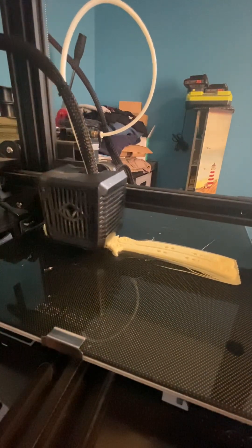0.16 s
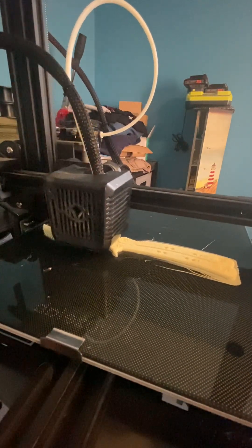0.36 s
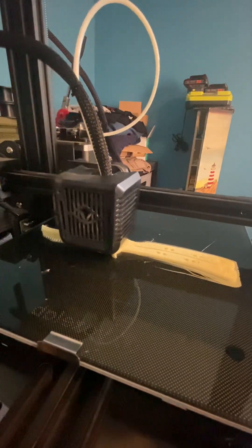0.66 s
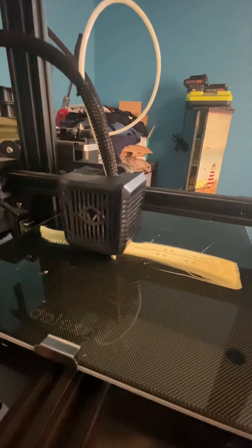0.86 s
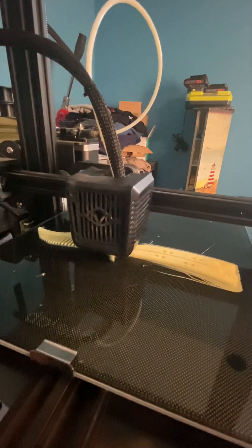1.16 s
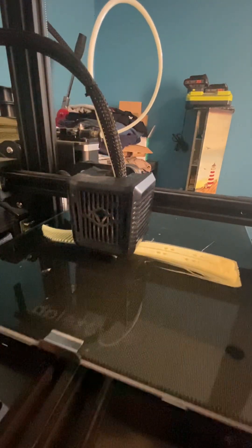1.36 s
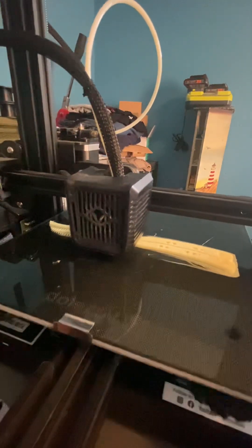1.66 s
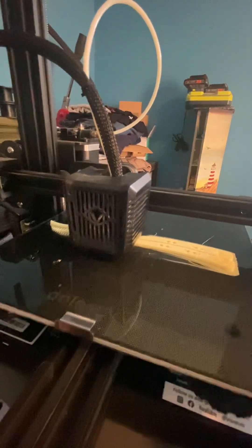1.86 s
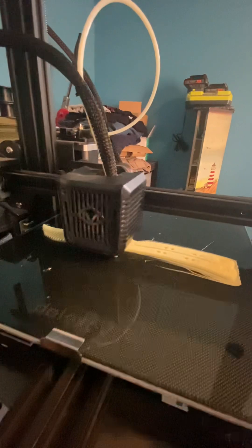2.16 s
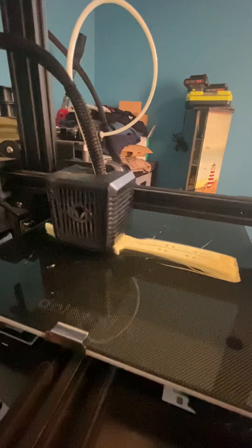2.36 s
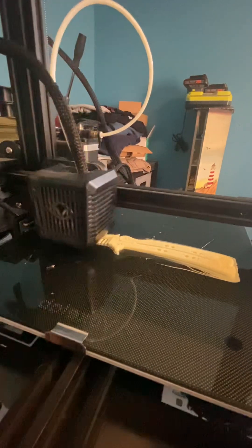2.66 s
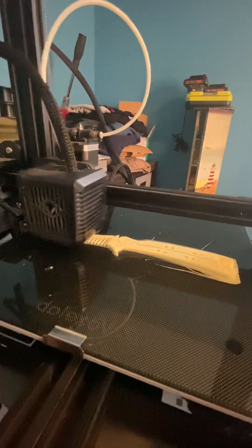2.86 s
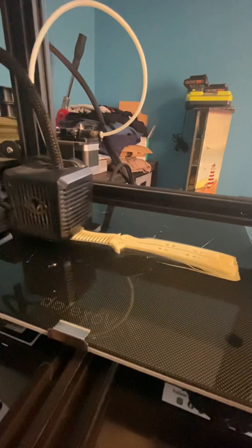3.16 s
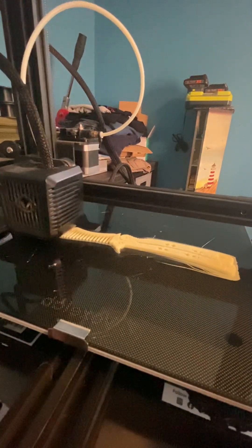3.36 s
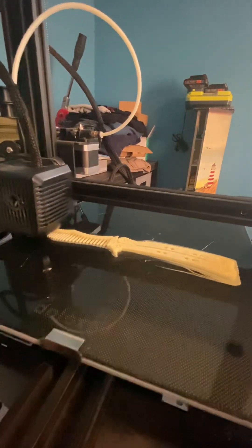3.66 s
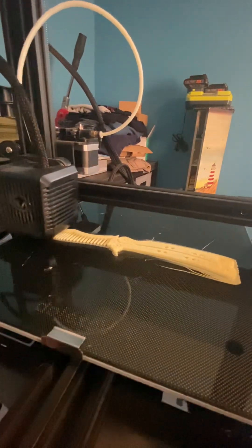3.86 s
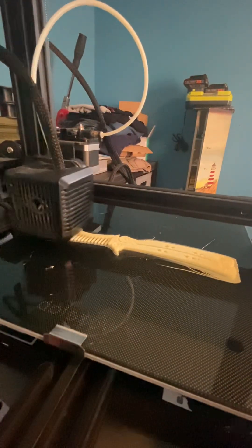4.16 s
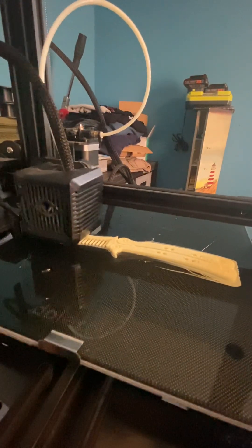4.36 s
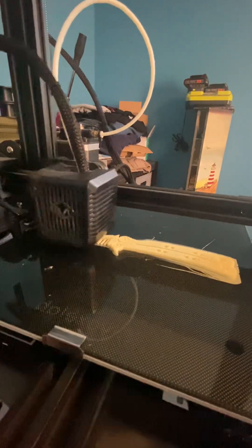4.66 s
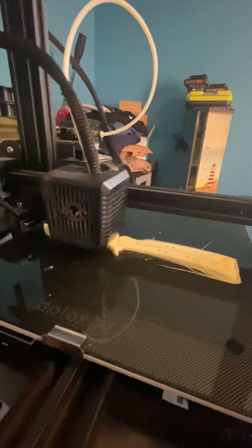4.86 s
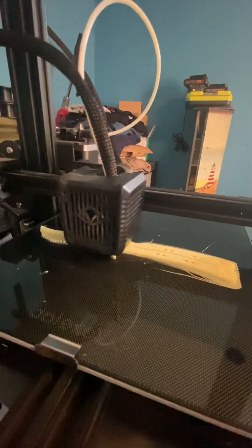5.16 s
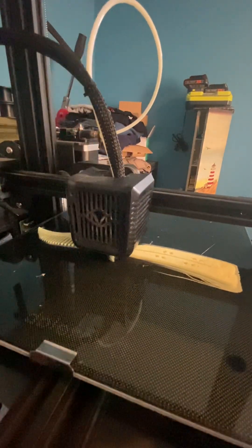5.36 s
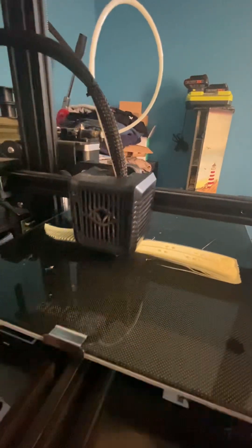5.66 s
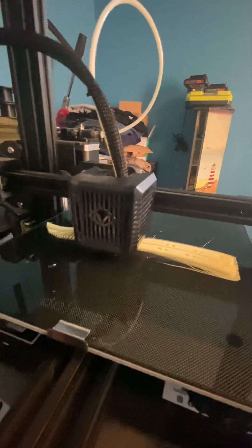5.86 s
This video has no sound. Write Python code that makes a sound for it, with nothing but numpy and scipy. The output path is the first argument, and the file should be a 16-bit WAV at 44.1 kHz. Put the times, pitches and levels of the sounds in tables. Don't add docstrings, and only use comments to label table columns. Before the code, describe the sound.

Small cooling fans whir and whine constantly over rushing air while a printer head slides about, its motors softly rumbling and knocking the table.

```python
import sys
import numpy as np
from scipy import signal
from scipy.fft import rfft, irfft, next_fast_len
from scipy.io import wavfile
from scipy.ndimage import uniform_filter1d

SR = 44100
rng = np.random.default_rng(int(sys.argv[2]) if len(sys.argv) > 2 else 0)


def persist_wave(psi):
    counts = np.round(np.clip(psi, -1, 1) * 32767).astype(np.int16)
    wavfile.write(sys.argv[1], SR, np.atleast_2d(counts).T)


def volts_from_db(level):
    exponent = np.asarray(level, float) / 20
    return 10 ** exponent


N = 265041
T = np.arange(N) / SR
BINS_HZ = np.linspace(1, SR / 2, next_fast_len(N) // 2 + 2)
SIDES = np.array([[.5], [-.5]])

# t/s, slide off to the left/0-1
HEAD_TRAVEL = [(0, .3), (.5, 0.23), (1.1, 0.02), (2.0, 0.12), (2.7, 0.36), (3.6, 0.91), (3.95, 0.86),
               (4.55, 0.52), (5.1, 0.14), (5.6, 0.24), (6.01, .1)]
# t/s, blade rate f/Hz
BLOWER_SPEED = [
    (0, 1188.8),
    (1.5, 1188.8),
    (2.2, 1186.2),
    (3.2, 1190.7),
    (3.6, 1189.2),
    (4.1, 1184.7),
    (4.9, 1182.2),
    (5.6, 1175.7),
    (6.01, 1175.1),
]
# f/Hz, level/dB per Hz
DUCT_AIR = [(900, -14), (1350, -9), (1750, -6), (2100, -3.5), (2350, -6), (2800, -39)]
SHROUD_AIR = [(2000, -24), (2450, -5), (2800, -9), (3150, -11), (3600, -30)]
BLADE_AIR = [(2800, -21), (3300, -12.5), (4000, -14), (4650, -13.5), (4950, -16), (5500, -11.5),
             (5900, -14.5), (6400, -18)]
HISS_AIR = [(5500, -35), (6000, -17), (6400, -15.5), (7000, -18.5), (7600, -20), (9500, -21),
            (10500, -23.5), (12500, -26.5), (14500, -31), (15100, -32.5), (15770, -31.5), (15850, -70)]
CASE_ORDERS = {8: (-46.5, -3.5, .38), 9: (-44.5, -.5, -0.47), 18: (-64.5, 1, -.5)}
# f/Hz, level/dB
MAINS_HUM = [(119.9, -60), (239.8, -57)]
# f/Hz, width/Hz, level/dB
PANEL_HUMS = [(117.6, 13, -58.5), (845, 27, -62), (4100, 24, -66.5), (4680, 45, -66)]
# f/Hz, level/dB per Hz
CASE_AIR = [(80, -26), (120, 0.5), (145, -3), (168, -11), (210, -2), (290, -4), (375, -0.5), (430, -7),
            (505, 3.5), (610, 3), (780, -3.5), (900, -7.5), (1150, -10), (1500, -20.5)]
# start t/s, length/s, level over idle/dB
MOTOR_MOVES = [
    (.85, 0.52, 7),
    (1.75, 0.33, 7),
    (2.3, 0.54, 6),
    (2.95, 0.87, 4.5),
    (4.4, .3, 5),
    (5.15, 0.47, 5),
    (5.85, .2, 5),
]
# f/Hz, level/dB per Hz
RUMBLE_COLOUR = [(18, -40), (27, -15), (48, -0.5), (66, -2), (88, -7.5), (110, -6), (150, -32)]
# t/s, level/dB, f/Hz, t60/s
TABLE_KNOCKS = [
    (.714, -32, 80, 0.073),
    (.735, -38, 46, 0.28),
    (2.11, -40, 66, .3),
    (2.97, -40, 100, 0.36),
    (4.41, -43, 90, .2),
    (5.25, -41, 96, 0.31),
    (5.379, -41, 59, .4),
    (5.939, -40, 48, .4),
]
# f/Hz, coherence/0-1, left minus right/dB
PORT_LIKENESS = [(40, 0.67, 1.6), (105, 0.83, -1), (240, .96, 0.3), (560, 0.85, -2), (750, 0.9, -4),
                 (866, 0.56, 7.5), (1000, 0.27, -2), (1210, 0.79, 1), (1950, 0.99, -1.5), (2480, 0.73, 1),
                 (2900, 0.35, -9), (3200, 0, 0.3), (3600, 0.47, -2.5), (7040, 0.95, -0.2)]
# f/Hz, left lead/half turns
PORT_LEAD = [(20, 0), (1300, -.07), (2000, 0), (2900, .14), (4400, .32), (5400, .3), (6500, .84),
             (7000, .96), (8050, 1.1), (9800, 1.93), (11300, 2.12), (12600, 2.92), (14600, 3.1),
             (15200, 3.8), (15800, 4)]

# (in front/dB, change at far left/dB)
WHINE_DB, BLOWER_DB, PAN_DB = (-45, -5), (-54.5, -3), (3, -3.5)
DUCT_DB, SHROUD_DB, HISS_DB = (1, -4.5), (-1, 2.5), (1, -3.5)
OVERTONE_DB, NULL_DB, NULL_WIDTH = -48, -7, 0.23
TURN_DB_PER_S = -.6
FAN_HZ, FAN_SAG_HZ_PER_S = 1166.2, .72
FAN_DROP_S, FAN_DROP_HZ, FAN_DROP_LASTS_S = 3.8, 2.9, .14
BLOWER_FREE_HZ, BLOWER_LOAD_DB_PER_HZ = 1188, 0.12
SHAFT_HZ, SHAFT_GAIN_HZ_PER_S = 80.83, .03
CASE_OPEN_DB = 0.5
IDLE_DB, MOVE_EASE_S = -3.5, .15
AIR_DB = -70


def head():
    travel = columns(HEAD_TRAVEL)[0]
    drop = (1 + np.tanh((T - FAN_DROP_S) / FAN_DROP_LASTS_S)) / 2
    fan_hz = FAN_HZ - FAN_SAG_HZ_PER_S * T - FAN_DROP_HZ * drop
    fan_turns = np.cumsum(fan_hz) / SR
    overtone_db = OVERTONE_DB + NULL_DB * np.exp(-((1 - travel) / NULL_WIDTH) ** 2)
    pan_db = slide(PAN_DB) + TURN_DB_PER_S * T
    out = whine(fan_turns, slide(WHINE_DB), pan_db, .05, waver_db=0.3)
    out = out + whine(2 * fan_turns, overtone_db - .7, pan_db - 5.5, 0.27, waver_db=1.3)
    out = out + whine(3 * fan_turns, overtone_db - 21, -1.2, .3, waver_db=1.5)

    blower_hz = columns(BLOWER_SPEED)[0]
    blower_db = slide(BLOWER_DB) + BLOWER_LOAD_DB_PER_HZ * (BLOWER_FREE_HZ - blower_hz)
    out = out + whine(np.cumsum(blower_hz) / SR, blower_db, 3.5, 0.32, waver_db=1.0)

    out = out + air(DUCT_AIR, flicker_db=0.54, rate_hz=6) * volts_from_db(slide(DUCT_DB))
    out = out + air(SHROUD_AIR, flicker_db=0.8, rate_hz=7) * volts_from_db(slide(SHROUD_DB))
    out = out + air(BLADE_AIR, flicker_db=0.7, rate_hz=7.14)
    return out + air(HISS_AIR, flicker_db=.5, rate_hz=10) * volts_from_db(slide(HISS_DB))


def case():
    turns = np.cumsum(SHAFT_HZ + SHAFT_GAIN_HZ_PER_S * T) / SR
    out = sum(whine(order * turns, *line, waver_db=1.05) for order, line in CASE_ORDERS.items())
    out = out * volts_from_db(CASE_OPEN_DB * (columns(HEAD_TRAVEL)[0] - 0.2))
    out = out + sum(whine(hz * T, db, 0, 0, waver_db=2.5) for hz, db in MAINS_HUM)
    return out + panels() + air(CASE_AIR, flicker_db=0.0, rate_hz=4.6)


def panels():
    gain = 0
    for hz, width_hz, db in PANEL_HUMS:
        detune = 2 * (BINS_HZ - hz) / width_hz
        gain = gain + volts_from_db(db) / np.sqrt(width_hz) / (1 + detune ** 2)
    return at_ports(BINS_HZ, gain)


def table():
    moving_db = sum(db * ((T > s) & (T < s + length_s)) for s, length_s, db in MOTOR_MOVES)
    rumble_db = IDLE_DB + uniform_filter1d(1. * moving_db, int(MOVE_EASE_S * SR))
    out = air(RUMBLE_COLOUR, flicker_db=-0.5, rate_hz=12) * volts_from_db(rumble_db)
    for s, db, hz, t60_s in TABLE_KNOCKS:
        age_s = np.maximum(T - s, 0)
        out = out + volts_from_db(db - 60 * age_s / t60_s) * np.sin(2 * np.pi * hz * age_s)
    return out


def whine(turns, db, pan_db, lead_rad, waver_db):
    phase = 2 * np.pi * (turns + rng.random()) + SIDES * lead_rad
    level_db = db + SIDES * pan_db + waver_db * walk(12)
    return np.sqrt(2) * volts_from_db(level_db) * np.sin(phase)


def air(colour, flicker_db, rate_hz):
    hz, db = np.transpose(colour)
    colour_db = np.interp(np.log(BINS_HZ), np.log(hz), db, left=-90, right=-90)
    return at_ports(BINS_HZ, volts_from_db(AIR_DB + colour_db)) * volts_from_db(flicker_db * walk(rate_hz))


def at_ports(hz, gain):
    port_hz, alike, pan_db = np.transpose(PORT_LIKENESS)
    alike = np.clip(np.interp(hz, port_hz, alike), 0, 1)
    lead_rad = np.pi * np.interp(hz, *np.transpose(PORT_LEAD))
    common, apart = rfft(rng.standard_normal((2, 2 * len(hz) - 2)))
    pair = np.sqrt((1 + alike) / 2) * common + 2 * SIDES * np.sqrt((1 - alike) / 2) * apart
    pair = pair * volts_from_db(SIDES * np.interp(hz, port_hz, pan_db))
    pair = pair * np.exp(1j * SIDES * lead_rad)
    return irfft(pair * gain * np.sqrt(SR / 2))[:, :N]


def walk(rate_hz):
    hold = int(SR / rate_hz)
    held = np.repeat(rng.standard_normal(N // hold + 1), hold)[:N]
    return 1.3 * uniform_filter1d(uniform_filter1d(held, hold), hold)


def slide(level_db):
    front_db, change_db = level_db
    return front_db + change_db * columns(HEAD_TRAVEL)[0]


def columns(curve):
    s, *rest = np.transpose(curve)
    return [np.interp(T, s, column) for column in rest]


def scene():
    return head() + case() + table()


def roll_off(x):
    return signal.sosfilt(signal.butter(12, 17060, fs=SR, output="sos"), x)


def record(dry):
    return roll_off(dry)


dry = scene()
out = record(dry)
persist_wave(out)
```